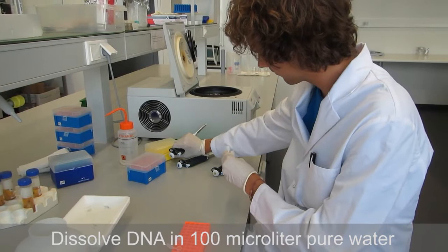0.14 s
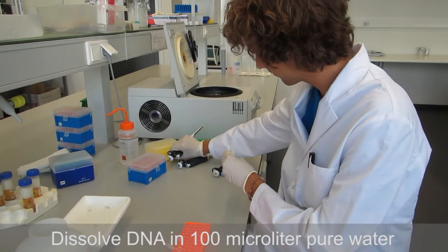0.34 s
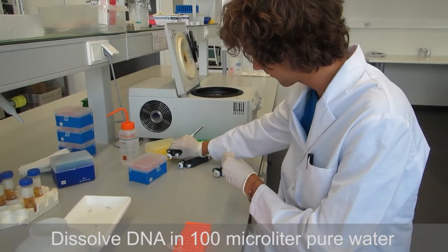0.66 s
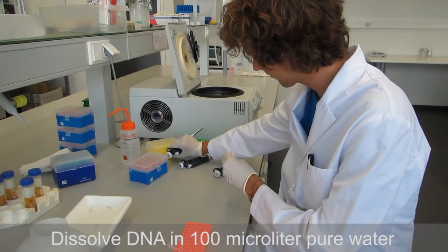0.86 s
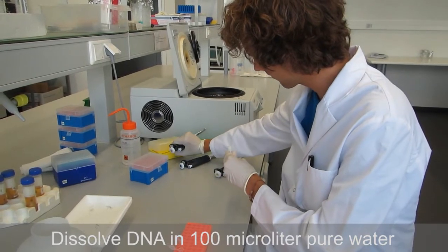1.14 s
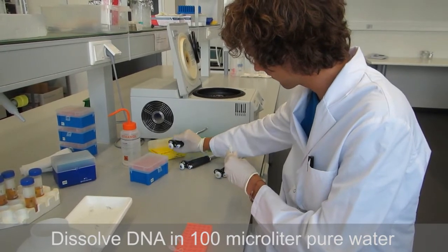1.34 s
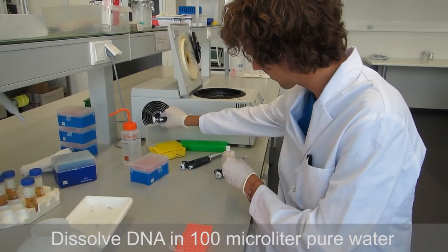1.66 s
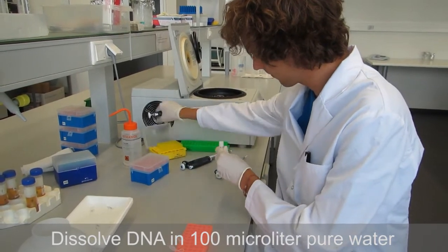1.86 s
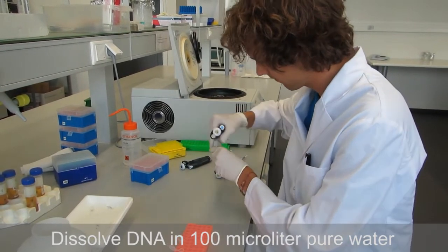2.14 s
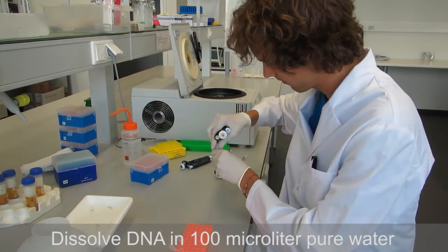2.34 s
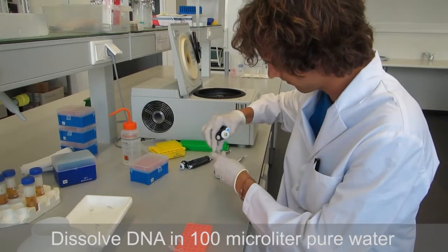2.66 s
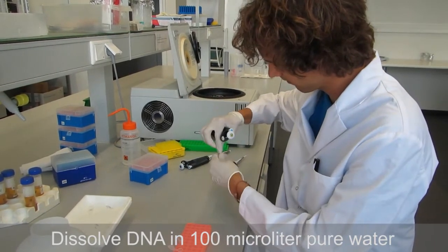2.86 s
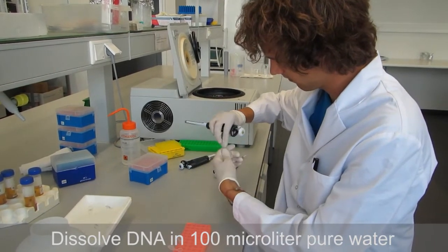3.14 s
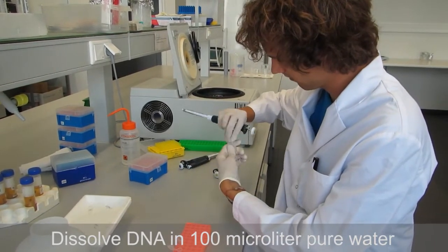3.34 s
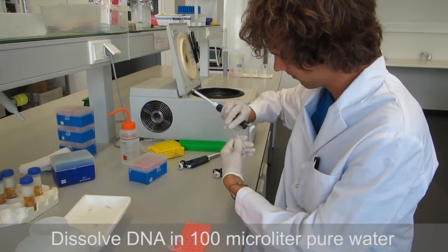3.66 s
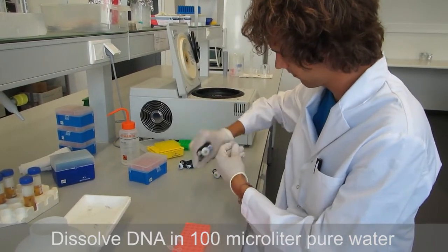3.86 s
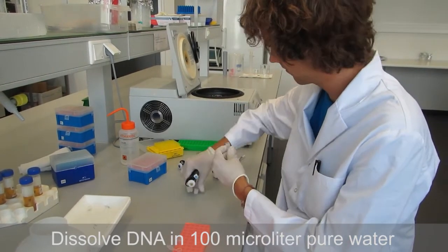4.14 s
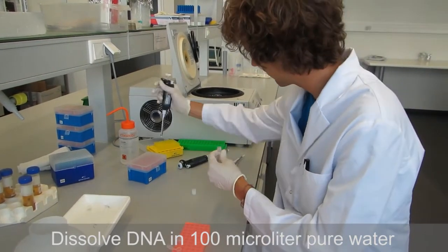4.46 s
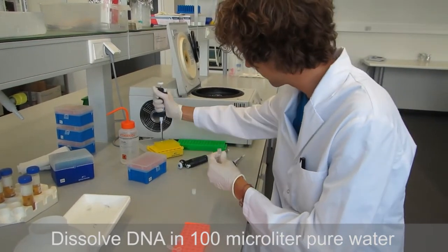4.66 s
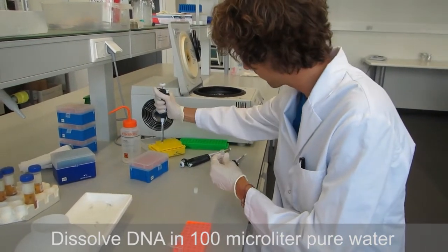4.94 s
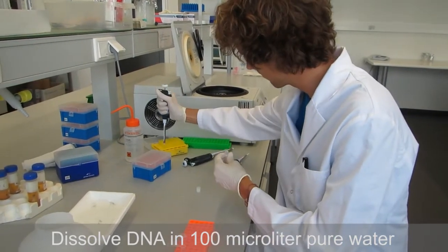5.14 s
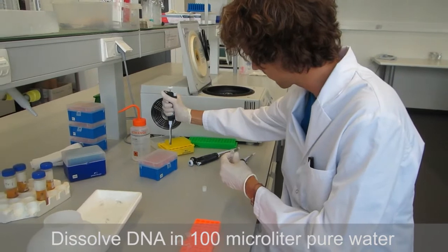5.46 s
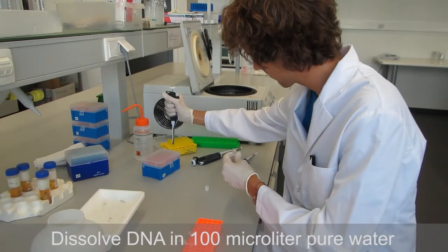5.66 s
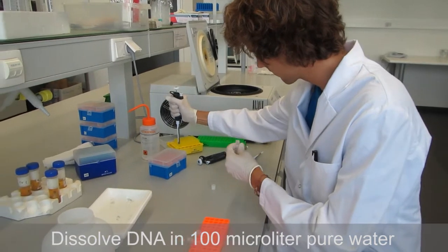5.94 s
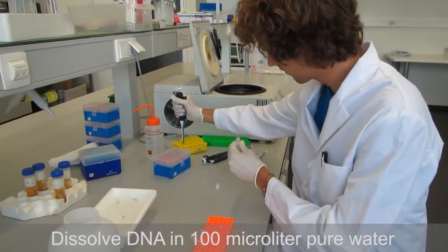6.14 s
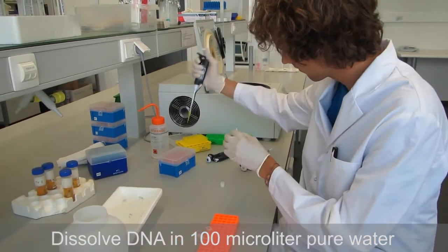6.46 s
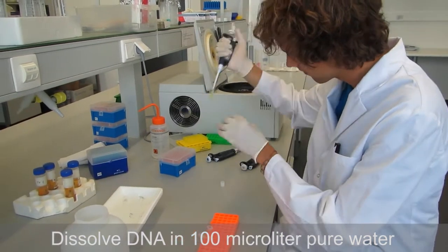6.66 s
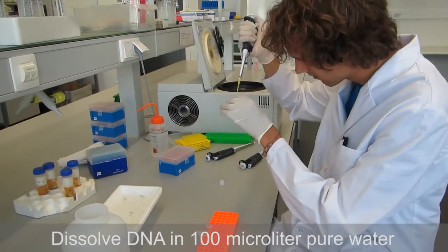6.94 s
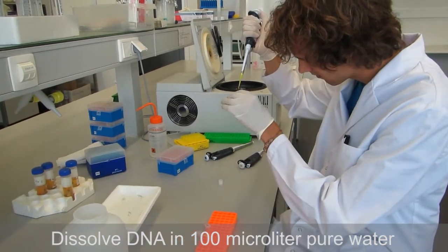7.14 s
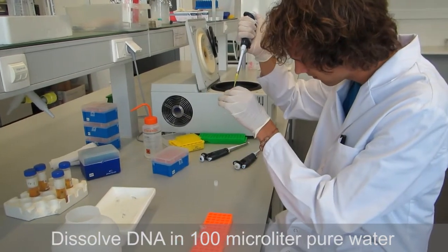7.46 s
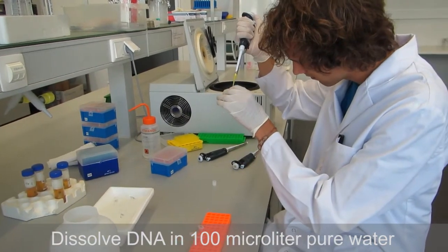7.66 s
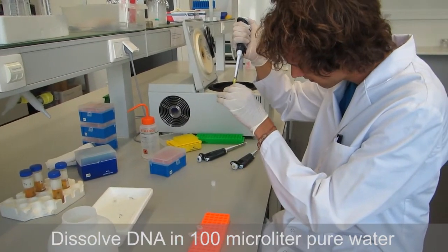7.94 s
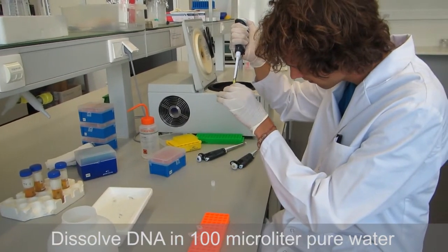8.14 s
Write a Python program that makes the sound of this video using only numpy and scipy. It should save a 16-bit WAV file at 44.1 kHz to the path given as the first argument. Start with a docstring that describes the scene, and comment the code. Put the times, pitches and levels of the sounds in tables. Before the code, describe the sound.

Close, dry plastic handling with a short bright room tail: sparse light ticks, one strong double knock on the bench, scattered clicks with a faint steel spring ping, a sharp ejector snap and small tip bounces, ticking at a tip rack, a muted stab and a loose lid rattle. It ends nearly empty, with just low ventilation rumble and faint hiss, and one late tick.

```python
"""Gloved hands handle plastic pipettes, tips and racks on a lab bench in a quiet, hard-walled room:
a knock on the bench, a tip that snaps off and bounces, a stab into the tip rack and many light ticks.
Each touch rings a set of dying tones, started by a crack of noise; slow hums, echoes and tails follow.
Shaped noise makes the low rumble of ventilation, the hiss, a far drone and the end of an earlier knock.
A gain control turns the sound down after loud blows and then lets it recover."""
import sys
import numpy as np
from scipy import signal
from scipy.fft import rfft, irfft
from scipy.io import wavfile
from scipy.ndimage import uniform_filter1d, minimum_filter1d

SR = 44100
rng = np.random.default_rng(int(sys.argv[2]) if len(sys.argv) > 2 else 0)


def waveform_to_disk(signal):
    """Save audio, clipped to [-1, 1], as 16-bit WAV at the path in sys.argv[1]."""
    frames = np.transpose(np.atleast_2d(signal))
    scaled = np.clip(frames, -1, 1) * 32767
    samples = np.round(scaled).astype(np.int16)
    wavfile.write(sys.argv[1], SR, samples)


N = 366030  # length in samples


def gain_of(db):
    """Turns decibels into a gain factor."""
    return 10 ** (np.asarray(db) / 20)


def evened(x):
    """Scales a signal to an rms level of 1."""
    return x / np.sqrt(np.mean(x ** 2) + 1e-20)


def read(points, hz):
    """Reads a (frequency, value) table in straight lines over a log-frequency axis."""
    f, value = np.transpose(points)
    return np.interp(np.log(hz + 1), np.log(f + 1), value)


def add(mix, s, sound):
    """Mixes a two-row sound in at s seconds, cut off at the end of the mix."""
    part = mix[:, round(s * SR):][:, :sound.shape[1]]
    part += sound[:, :part.shape[1]]


def ring(modes, strength_db, contact_s, crack_db, blur, crack_hz=14000):
    """Modes (ringing tones) swell over the contact time and die by their width; a crack starts them."""
    # row 0 goes to the microphone; row 1 goes to the walls, where all directions blur the peaks
    hz, width_hz, db = np.array(modes, float).T[:, :, None]
    t = np.arange(1300) / SR
    contact_s = max(contact_s, 1e-4)
    blur = np.array([1, max(blur, 1)])[:, None, None]
    phase = 2 * np.pi * rng.random(hz.shape)
    width_hz = np.maximum(width_hz, 40)
    height = gain_of(db) * width_hz  # a wide peak starts taller
    decay = np.exp(-np.pi * width_hz * blur * t)
    tones = height * decay * np.sin(2 * np.pi * hz * t + phase)
    swell = (1 - np.exp(-blur * t / contact_s)) ** 2
    body = (tones * blur * swell).sum(1) / np.linalg.norm(height)

    noise = signal.lfilter([-0.52, 1.0, -0.65, -1.3], 1, rng.standard_normal(len(t)))
    crack = noise * t / contact_s * np.exp(1 - t / contact_s)
    crack = signal.lfilter(*signal.butter(2, min(crack_hz, 20000), fs=SR), crack)
    return gain_of(strength_db) * (body + gain_of(crack_db) * crack)


def blows(events, modes, crack_db, blur, chatter_db, low_hz, wet_db, crack_hz, room_low_hz=None):
    """Every blow rings the same object with its own brightness; loose parts chatter after it."""
    out = np.zeros((2, N))
    for s, strength_db, tilt_db, contact_s in events:
        tilted = [(f, w, db + tilt_db * np.log2(f / 3000)) for f, w, db in modes]
        add(out, s, ring(tilted, strength_db, contact_s, crack_db, blur, crack_hz))
        for late_s in 0.0027 * (np.arange(5) + rng.random(5)):
            late_db = strength_db + chatter_db - 800 * late_s
            add(out, s + late_s, ring(tilted, late_db, contact_s, crack_db, blur, crack_hz))
    # a small thing radiates little bass; the part sent to the room may keep more of it
    to_mic, to_walls = [signal.sosfilt(signal.butter(4, edge_hz, "high", fs=SR, output="sos"), row)
                        for edge_hz, row in zip((low_hz, room_low_hz or low_hz), out)]
    return np.array([to_mic, to_walls * gain_of(wet_db)])


def hum(events, modes):
    """Bundles of close modes beat roughly against each other while they die away slowly."""
    out = np.zeros((2, N))
    t = np.arange(SR * 4 // 5) / SR
    hz, db, t60_s = np.array(modes, float).T[:, :, None, None]
    detune, phase = rng.random((2, len(modes), 24, 1))  # 24 tones to a bundle
    spread_hz = 55 * np.maximum(hz / 2000, 1) ** .7  # to either side, wider above 2 kHz
    bundle_hz = hz + spread_hz * (2 * detune - 1)
    tones = gain_of(db - 60 * t / t60_s) * np.sin(2 * np.pi * (bundle_hz * t + phase))
    tone = tones.sum((0, 1)) * (1 - np.exp(-t / 0.0096))  # swells over about 10 ms
    for s, strength_db, _, _ in events:
        add(out, s, gain_of(strength_db) * np.array([tone, tone]))
    return out


def bench_knocks():
    """A pipette knocks on the bench: its plastic rings shortly and the bench top hums on."""
    # blows: (time [s], strength [dB], brightness [dB per octave], contact time [s])
    knocks = [(2.0509, -14.5, -4, 0.0002), (2.052, 5.5, -0.5, 0.00043), (2.1402, -2.5, -12, 0.00031),
              (2.1423, -5, -6, 0.00074)]
    # modes of the pipette on the bench: (frequency [Hz], width [Hz], level before width weighting [dB])
    pipette_on_bench = [(684, 100, -12), (886, 65, -9), (1090, 80, -1), (1380, 190, -3), (1740, 160, -4),
                        (1935, 130, -1), (2375, 100, -9.5), (2590, 330, -0.5), (3149, 150, -12),
                        (3500, 130, -13), (3900, 200, -14.5), (4590, 220, -5), (4977, 380, -8),
                        (5850, 500, -4), (7270, 400, -13), (8220, 300, -11.5), (9400, 250, -12.5),
                        (10840, 350, -10.5), (11560, 300, -14.5), (13060, 350, -20)]
    # slow modes of the bench top: (frequency [Hz], level of each tone against the blow [dB], t60 [s])
    bench_top = [(150, -58.5, .12), (261, -54.5, 0.22), (375, -59.5, .25), (613, -57.5, .3),
                 (780, -75.5, 1.3), (1793, -74, 1.6), (2370, -71.5, 1.6), (4400, -80.5, 1.1),
                 (5710, -78, 1.1), (9800, -82, 1.5)]
    # the bench top booms into the room, so the room gets more bass
    knocking = blows(knocks, pipette_on_bench, crack_db=-15.5, blur=2.0, chatter_db=-14.5, low_hz=930,
                     wet_db=-4.5, crack_hz=13000, room_low_hz=429.5)
    return knocking + hum(knocks, bench_top)


def tip_snap_and_bounces():
    """The ejector snaps a tip off, the light tip bounces, and both leave a slow hum."""
    # blows: (time [s], strength [dB], brightness [dB per octave], contact time [s])
    snaps = [(2.368, -22, -2.2, 0.00055), (4.2438, -3, 0.86, 0.00016)]
    bounces = [(4.544, -15, 0, 0.00011), (4.6338, -26, 0.00072, 0.00033)]
    # modes of ejector and tip: (frequency [Hz], width [Hz], level before width weighting [dB])
    ejector = [(1830, 1300, -45), (2280, 85, -9), (2680, 120, -9.5), (5420, 530, -3.5), (6280, 510, 3),
               (6720, 880, 0), (6800, 160, -30), (8000, 100, -12), (9650, 28, -19), (8860, 290, -14),
               (9330, 330, -6.5), (10400, 130, -33), (10900, 240, -6.5), (15800, 150, -16)]
    tip = [(1530, 45, -14), (1963, 48, -2), (3150, 140, -3), (4585, 340, 0.5), (5450, 220, -2),
           (6320, 240, -4.5), (7840, 120, -4), (8700, 360, -15), (8800, 75, -31), (9390, 71, -33),
           (10200, 44, -6), (11100, 68, -3.5), (14100, 220, -16)]
    # slow modes: (frequency [Hz], level of each tone against the blow [dB], t60 [s])
    tip_hum = [(2275, -67, 0.54), (2830, -67, 1.1), (4370, -68, 1.74), (5320, -68, 1.2), (6360, -63, 0.74),
               (8250, -68, 0.79), (9700, -65.5, 1.1), (11200, -70, 0.72)]
    snapping = blows(snaps, ejector, crack_db=-15.5, blur=1.96, chatter_db=-6.5, low_hz=1370,
                     wet_db=-7.5, crack_hz=8500)
    bouncing = blows(bounces, tip, crack_db=-20.5, blur=4.1, chatter_db=-2.5, low_hz=1380,
                     wet_db=-12.0, crack_hz=14000)
    return snapping + bouncing + hum(snaps + bounces, tip_hum)


def rack_stab_and_rattle():
    """A stab rings the tip rack, its lid rattles, and both leave a slow hum."""
    # blows: (time [s], strength [dB], brightness [dB per octave], contact time [s])
    stabs = [(5.8672, -19.5, -5, 0.0013), (5.8738, -32, -3, 0.00047), (5.8775, -25.5, 3.5, 0.00039)]
    rattles = [(6.299, -26, -0.48, 0.00056), (6.308, -25, -.5, 0.0014), (6.315, -10, 0.78, 0.0012),
               (6.33, -27, 1.7, 0.00086), (6.353, -24, 1.4, 0.0021)]
    # modes of rack and lid: (frequency [Hz], width [Hz], level before width weighting [dB])
    rack = [(1130, 63, 7), (1500, 96, -11), (2080, 120, -8), (2380, 88, -11), (3040, 130, -14),
            (3600, 90, -13.5), (4014, 78, -1), (4260, 60, -8), (4670, 100, -7.5), (4970, 100, -15),
            (5620, 180, -13), (8740, 130, -30), (11170, 250, -26.5), (13700, 130, -47.5)]
    rack_lid = [(1096, 65, 6.5), (3780, 89, -7), (1286, 146, 7), (1680, 260, 3), (2200, 150, 0),
                (2700, 250, 6), (4330, 470, 1.5), (5440, 360, 0.5), (5900, 330, -6.5), (6860, 110, -19),
                (7500, 250, -15), (9500, 110, -30), (10100, 110, -26), (10780, 97, -17), (11100, 370, -6),
                (13300, 150, -14)]
    # slow modes: (frequency [Hz], level of each tone against the blow [dB], t60 [s])
    rack_hum = [(2150, -60, 1.38), (2640, -66, 1.1), (3750, -66, 1.33), (1577, -64, 1.1), (5670, -67, 0.92)]
    stabbing = blows(stabs, rack, crack_db=-31.5, blur=4.8, chatter_db=-8, low_hz=880,
                     wet_db=-13.5, crack_hz=8000)
    rattling = blows(rattles, rack_lid, crack_db=-39.0, blur=2.3, chatter_db=2.5, low_hz=970,
                     wet_db=-7.0, crack_hz=12000)
    return stabbing + rattling + hum(stabs + rattles, rack_hum)


def grips():
    """A hand grips the pipette, and the plunger rings softly."""
    # blows: (time [s], strength [dB], brightness [dB per octave], contact time [s])
    touches = [(1.2106, -32.5, 2, 0.00022), (1.2311, -31.5, 0.5, 0.00036), (1.269, -29, -1.5, 0.00057),
               (1.281, -34.5, -3, 0.00051)]
    # modes of the plunger: (frequency [Hz], width [Hz], level before width weighting [dB])
    plunger = [(744.5, 91, -9), (1290, 100, -6.5), (2420, 79, -8), (2470, 61, -3.5), (3090, 100, -5),
               (3750, 90, -3.5), (6560, 120, -15.5), (10175, 320, -7), (10890, 310, -5), (11900, 390, -7.5),
               (13030, 434, -9), (14400, 460, -13), (15500, 400, -12)]
    return blows(touches, plunger, crack_db=-27.0, blur=2.0, chatter_db=-8.5, low_hz=600,
                 wet_db=-7.5, crack_hz=15000)


def ticks():
    """Small plastic parts touch lightly: two pitches of their own over the modes of what the hands hold."""
    # light touches: (time [s], strength [dB], pitch [Hz], second pitch [Hz],
    #                 level of the second pitch [dB], level of the held plastic [dB])
    touches = [(0.307, -52.5, 4230, 2330, 8, -1), (0.3327, -46, 1170, 6660, -18, -8),
               (0.343, -58, 2260, 6700, -8, -18), (0.368, -61, 6700, 2100, 0, -15),
               (0.388, -60, 6650, 2420, 0, -10), (0.5068, -50.5, 6760, 4190, -9, -11),
               (0.68, -51.5, 10100, 6750, 2, -15), (0.6806, -51, 10800, 11500, -8, -20),
               (1.126, -53.5, 1490, 3500, -3, -11), (1.1933, -41, 780, 11300, -18, -14),
               (1.659, -43, 5190, 5683, -2, -9), (1.659, -44, 3850, 3218, -0.5, -14),
               (1.661, -45, 6420, 6800, -1, -10), (1.662, -47.5, 2500, 10560, -0.5, -7.5),
               (1.7094, -44.5, 11750, 10230, 0, -4.5), (2.487, -43.5, 2490, 5660, -8, -17),
               (2.523, -44.5, 5670, 10530, 1.5, -15), (2.547, -50, 5900, 2310, -2, -14.5),
               (2.563, -54, 1800, 5700, -9, -21), (2.585, -54.5, 800, 1860, -7, -23),
               (2.6191, -50, 1910, 800, -3, -23), (2.707, -55.5, 1820, 2020, -4, -17),
               (2.722, -50, 1830, 10100, 1, -20), (2.717, -44.5, 8750, 5150, -3.5, -13),
               (2.739, -60, 1850, 5090, 9, -20), (2.7937, -52.5, 2810, 5100, 0, -20),
               (2.9431, -48.5, 4150, 5500, -8, -5), (3.055, -48.5, 10540, 9540, -4, -14),
               (3.421, -53, 6530, 3980, -6, -6), (3.4502, -49, 9530, 8170, -1, -22),
               (3.469, -44.5, 14600, 5850, 5, -18), (3.471, -42, 4580, 2490, 1.5, -9),
               (3.585, -51.5, 3400, 1540, -4, -3), (3.6136, -44, 2860, 6400, -13.5, -14),
               (3.645, -53, 2880, 5480, -7, -14), (3.678, -34.5, 14500, 10200, -4, -15),
               (3.685, -42, 8200, 9500, -5, -26), (3.695, -42.5, 3050, 6240, 1, -20),
               (3.704, -52, 10200, 8100, -2, -14), (3.8336, -41.5, 7700, 2600, -7, -10),
               (3.838, -48, 5610, 4710, 4, -21), (4.3243, -33.5, 2380, 2920, 0, -16),
               (4.375, -39, 4270, 6400, -8, -14), (4.405, -38, 4750, 2690, -7, -6.5),
               (4.4755, -36.5, 4600, 2300, -16, 4), (4.516, -39, 2870, 11000, -3, -14),
               (4.526, -34, 11400, 5300, 2, 4), (4.674, -46, 4540, 5180, -3.5, 5),
               (4.7288, -43.5, 8500, 14000, 0, -9), (5.3887, -41.5, 2660, 2112, 3, -18.5),
               (5.4329, -34, 2160, 5900, -12, -10), (5.4393, -39.5, 2590, 4820, -3, -28),
               (5.4507, -51, 5930, 2150, -13, -25), (5.4907, -48, 2210, 2590, -8, -19),
               (5.496, -47, 4900, 3920, 3, -20), (5.521, -46, 2244, 1400, 3, -20),
               (5.527, -33.5, 5100, 4010, -3, -27), (5.528, -36.5, 5500, 4750, -10, -25),
               (5.5316, -47, 2500, 2210, 0, -22), (5.55, -61, 3970, 2150, -15, -32),
               (5.757, -40.5, 2130, 5130, -6, -9.5), (5.7617, -36.5, 4000, 5240, -7, -19),
               (5.7833, -41.5, 8750, 5470, -5, -6), (6.103, -36, 5310, 3790, -7, -28),
               (6.106, -43, 7700, 6560, 5, -18.5), (6.114, -38, 7050, 7700, -3.5, -20.5),
               (6.242, -57, 5100, 3840, -1, -8), (6.281, -35, 6180, 2150, 2.5, -17),
               (6.282, -41, 4450, 3540, -3, -20), (6.3434, -26, 2040, 10760, -16, -13.5),
               (6.3737, -36, 3970, 1750, -9, -14), (6.3784, -33, 2340, 4220, -11, -8),
               (6.62, -46.5, 10330, 7670, -3, -6), (6.6616, -38.5, 10300, 11150, -17, -20),
               (7.773, -38, 5810, 2650, -9, -15)]
    # pipette, tips and rack in the hands ring along: (frequency [Hz], relative level [dB])
    held_plastic = [(900, -10.5), (1500, -6), (2200, -2.5), (2900, -3.5), (3900, -2.5), (4600, -3.5),
                    (5300, -0.5), (5900, -4), (6500, -5.5), (7800, -8.5), (8800, -9), (10200, -6.5),
                    (11400, -8.5), (13500, -10.5)]
    out = np.zeros((2, N))
    body_hz, body_db = np.transpose(held_plastic)
    # every touch lands elsewhere, so the levels scatter
    scatter_db = 2.5 * rng.standard_normal((len(touches), len(body_hz)))
    for touch, chance_db in zip(touches, scatter_db):
        s, strength_db, pitch_hz, second_hz, second_db, held_db = touch
        # a higher tick wakes the upper modes: 1.5 dB per octave, for each octave of its pitch
        tilt_db = 1.5 * np.log2(pitch_hz / 4000) * np.log2(body_hz / 4000)
        hz = np.r_[pitch_hz, second_hz, body_hz]
        db = np.r_[0, second_db, held_db + body_db + tilt_db + chance_db]
        width_hz = 123 * (hz / 4000) ** .3
        modes = np.c_[hz, width_hz, db]
        add(out, s, ring(modes, strength_db, contact_s=0.00059, crack_db=-34, blur=2.7))
    return out * gain_of([[0], [-1.5]])


def spring():
    """The plunger's spring is flicked: thin steel rings much longer and cleaner than plastic."""
    # flicks: (time [s], strength [dB])
    pings = [(3.682, -49), (4.546, -56)]
    # tones of the steel: (frequency [Hz], relative level [dB], t60 [s])
    steel = [(5720, 1.5, 0.11), (7770, -13, 0.37)]
    out = np.zeros((2, N))
    t = np.arange(SR // 2) / SR
    tone = np.zeros(len(t))
    for hz, db, t60_s in steel:
        tone += gain_of(db - 60 * t / t60_s) * np.sin(2 * np.pi * (hz * t + rng.random()))
    tone *= 1 - np.exp(-t / 0.001)  # a soft start
    for s, strength_db in pings:
        add(out, s, gain_of(strength_db) * np.array([tone, tone]))
    return out


def room(direct, to_walls, wet_db=-4.5):
    """A few near echoes, then dense taps of random sign, each band dying at its own speed."""
    # near echoes from bench, rack and shelf: (delay [s], level [dB])
    echoes = [(.0012, -10), (.0022, -11), (.0035, -11)]
    # how long the room rings: (frequency [Hz], t60 [s])
    decay_times = [(300, 0.068), (1000, 0.45), (2500, 0.45), (6000, 0.62), (11000, 0.3), (15000, 0.33)]
    # tone colour of the tail: (frequency [Hz], relative level [dB])
    colour = [(300, 11.5), (1000, -5), (3000, -8), (6000, -13.5), (11000, -4.5), (15000, -11)]
    near = np.zeros(400)
    for s, db in echoes:
        near[round(s * SR)] = gain_of(db)
    out = direct + signal.oaconvolve(direct, near)[:N]

    sent = to_walls + gain_of(-15) * direct
    turn = np.arange(N) / SR * 9  # radians
    for k in range(2):  # two tails take turns, so that the tail varies from blow to blow
        taps = np.zeros(SR)
        at = np.arange(60, SR - 12, 12) + rng.integers(0, 12, (SR - 61) // 12)
        taps[at] = rng.choice([-1., 1.], at.shape) * (1 - np.exp(-at / SR / 0.0046))
        taps[at] *= 1 + 0.5 * np.exp(-at / SR / 0.063)  # the bench corner answers first and louder
        hz, t, z = signal.stft(taps, SR, nperseg=256)
        z = z * gain_of(read(colour, hz)[:, None] - 60 * t / read(decay_times, hz)[:, None])
        tail = signal.istft(z, SR, nperseg=256)[1]
        tail = tail / np.linalg.norm(tail)
        share = np.cos(turn + k * np.pi / 2)
        out = out + gain_of(wet_db) * signal.oaconvolve(sent * share, tail)[:N]
    return out


def slow_tail(direct):
    """A faint, slow tail of filtered noise follows each blow, carrying its pitches for about a second."""
    t = np.arange(SR) / SR
    t60_s, rise_s = 1.127, 0.049
    tail = rng.standard_normal(SR) * gain_of(-60 * t / t60_s) * (1 - np.exp(-t / rise_s))
    tail = signal.sosfilt(signal.butter(2, (1500, 14000), "band", fs=SR, output="sos"), tail)
    return gain_of(-24) * signal.oaconvolve(direct, tail / np.linalg.norm(tail))[:N]


def earlier_knock():
    """The last of a knock that still dies away in the room at the start, made of shaped noise."""
    # colour of the noise: (frequency [Hz], relative level [dB per Hz])
    colour = [(200, -25), (400, -10), (800, 2), (1500, -5), (3000, -21), (8000, -30)]
    hz = np.fft.rfftfreq(N, 1 / SR)
    noise = evened(irfft(rfft(rng.standard_normal(N)) * gain_of(read(colour, hz)), N))
    start_db, t60_s = -53, .5
    return gain_of(start_db - 60 * np.arange(N) / SR / t60_s) * noise


def background():
    """Random short-time spectra: steady air, and a lumpy far drone that dulls and dies away unevenly."""
    # ventilation and hiss: (frequency [Hz], relative level [dB per Hz])
    air_colour = [(10, -30.5), (18, -6), (46, -2), (75, -17), (107, -8.5), (198, -22), (290, -27.5),
                  (718, -36.5), (934, -33.5), (1200, -38), (3000, -48.5), (6460, -54.5), (11500, -56),
                  (12600, -62), (16000, -74)]
    # the drone: (frequency [Hz], relative level [dB per Hz])
    drone_colour = [(50, -33.5), (90, -3.5), (160, 4), (250, 0), (400, -7.5)]
    # course of the drone: (time [s], level [dB], upper edge [Hz])
    drone_pass = [(0, -48, 402.5), (.53, -48.5, 360), (.67, -53.5, 364.2), (1.02, -48, 389.5),
                  (1.4, -52.5, 386.6), (1.6, -51, 316), (2.22, -50, 314.5), (2.5, -55.5, 316.4),
                  (3.2, -50.5, 307.3), (3.6, -57, 244.1), (4.02, -50.5, 233.5), (4.3, -55.5, 232.1),
                  (4.8, -54.5, 188.8), (5, -57, 183), (6, -61.5, 180.4), (7.35, -66.5, 180.4),
                  (7.67, -56.5, 174.2), (8.3, -76, 167.9)]
    frames = N // 512 + 5
    hz = np.fft.rfftfreq(2048, 1 / SR)
    a, b, patches = rng.standard_normal((frames, 1025, 3)).T
    # the drone fills only the lowest 80 frequency bins
    c, d = np.pad(rng.standard_normal((frames, 80, 2)).T, ((0, 0), (0, 945), (0, 0)))
    # smooth patches of louder and softer noise
    patches = uniform_filter1d(patches, size=5, axis=0)
    patches = evened(uniform_filter1d(patches, size=12, axis=1))

    s, level_db, edge_hz = np.transpose(drone_pass)
    top_hz = np.interp(np.arange(frames) * 512 / SR, s, edge_hz)
    dull = 1 / np.sqrt(1 + (hz[:, None] / top_hz) ** 12)
    air = (a + 1j * b) * gain_of(read(air_colour, hz)[:, None] + 0.8 * patches)
    drone = (c + 1j * d) * dull * gain_of(read(drone_colour, hz)[:, None] + 2.0 * patches[::-1])
    air, drone = (evened(signal.istft(z, nperseg=2048, noverlap=1536)[1][:N]) for z in (air, drone))
    drone_db = np.interp(np.arange(N) / SR, s, level_db)
    return gain_of(-47.5) * air + gain_of(drone_db) * drone


def scene():
    """Handling sounds in the room over the background; the whole scene sinks by 1 dB near the end."""
    hands = (bench_knocks() + tip_snap_and_bounces() + rack_stab_and_rattle() + grips()
             + ticks() + spring())
    direct, to_walls = hands
    mix = room(direct, to_walls) + slow_tail(direct) + earlier_knock() + background()
    fade_from_s, fade_s, fade_db = 7.37, 0.51, -1
    progress = np.clip((np.arange(N) / SR - fade_from_s) / fade_s, 0, 1)
    return (mix * gain_of(fade_db * progress))[None]


def record(dry):
    """Gain control ducks after loud blows, holds and recovers; then soft overload, a dip, a band limit."""
    power = signal.lfilter([.002], [1, -.998], dry[0] ** 2)
    power_db = 10 * np.log10(abs(power) + 1e-12)
    hold = round(.3 * SR) // 2  # half of the 0.3 s hold, in samples
    held_db = -minimum_filter1d(-power_db, 2 * hold + 1, origin=hold)  # loudest of the last 0.3 s
    fall_db = np.arange(N) * 90.0 / SR  # the held level falls by 90 dB a second
    recovering_db = np.maximum.accumulate(held_db + fall_db) - fall_db
    over_db = np.maximum(recovering_db + 36.0, 0)  # above the threshold of -36 dB
    ducked = dry / gain_of(0.23 * signal.lfilter([.004], [1, -.996], over_db))
    soft = .95 * np.tanh(ducked / .95)  # the loudest crack saturates the input softly
    dipped = signal.lfilter(*signal.iirnotch(12400, 30, SR), soft)  # narrow dip of the microphone
    band_limit = signal.firwin(511, 16000, window=("kaiser", 9), fs=SR)
    return signal.oaconvolve(dipped, band_limit[None], "same")


dry = scene()
out = record(dry)
waveform_to_disk(out)
```